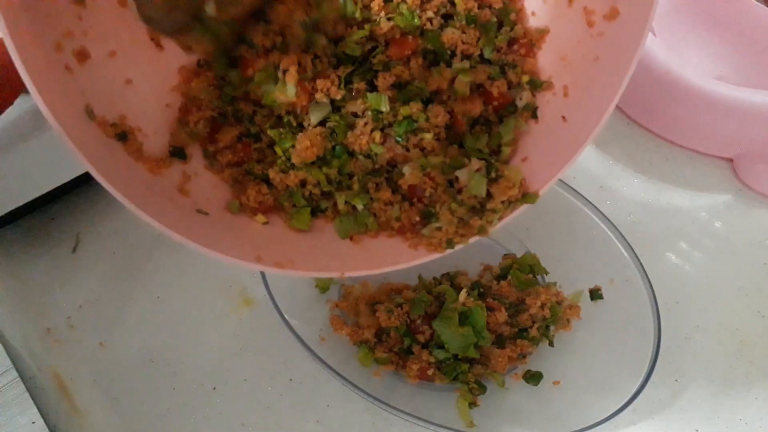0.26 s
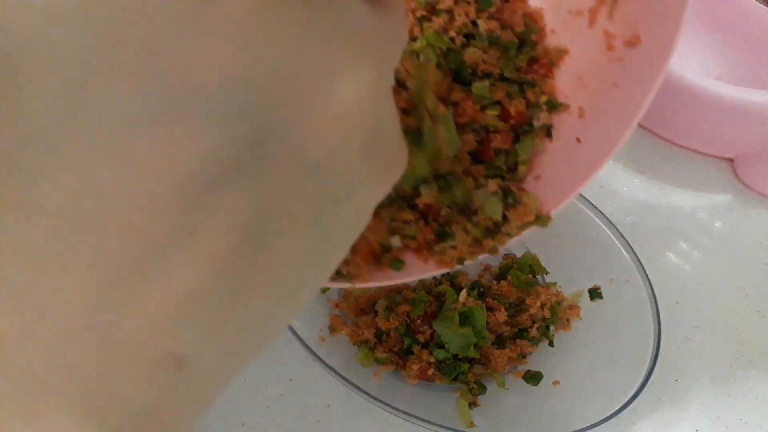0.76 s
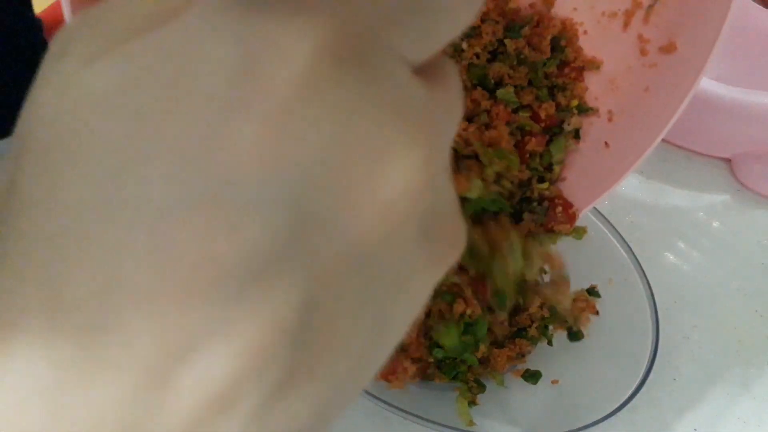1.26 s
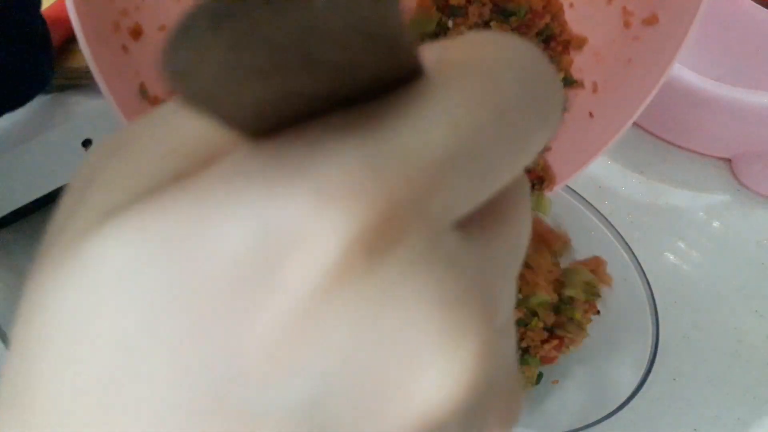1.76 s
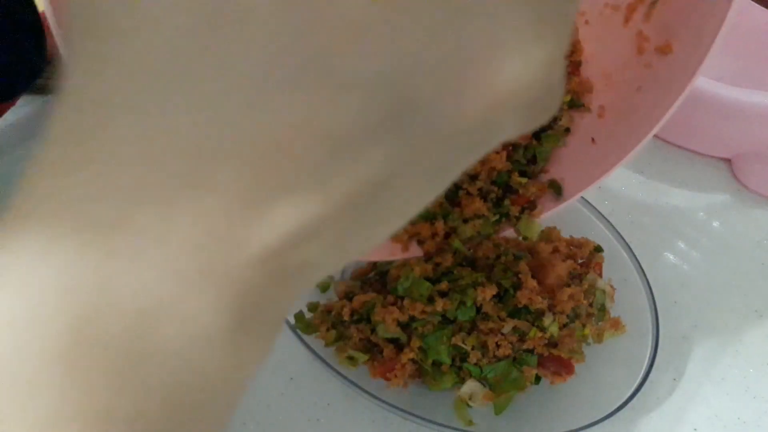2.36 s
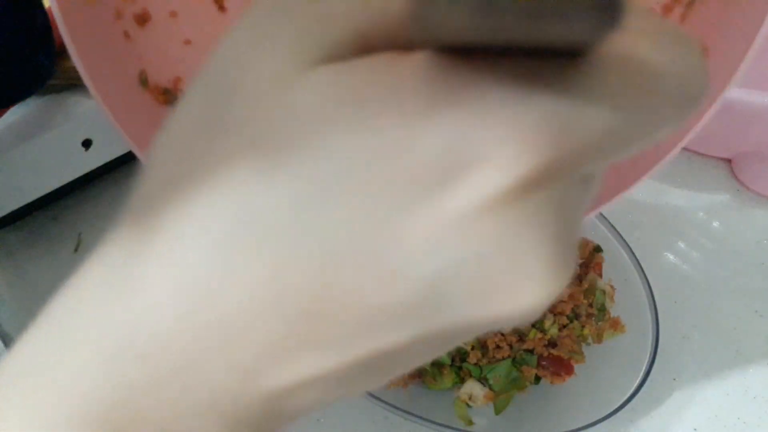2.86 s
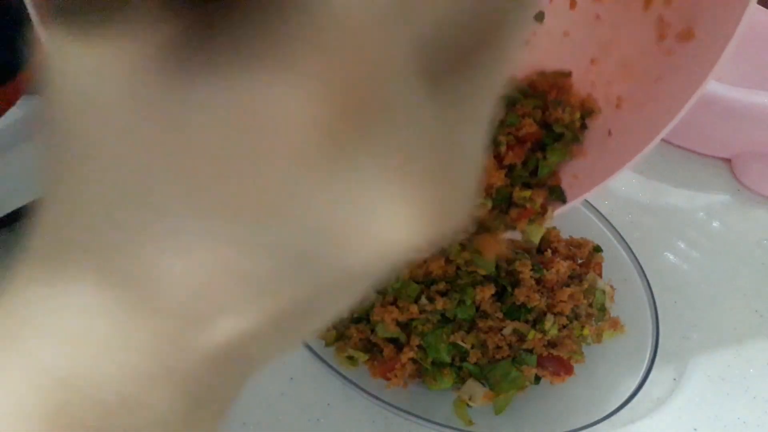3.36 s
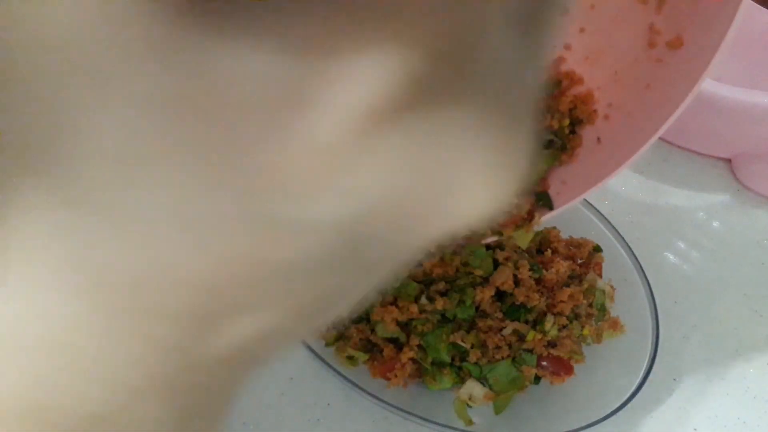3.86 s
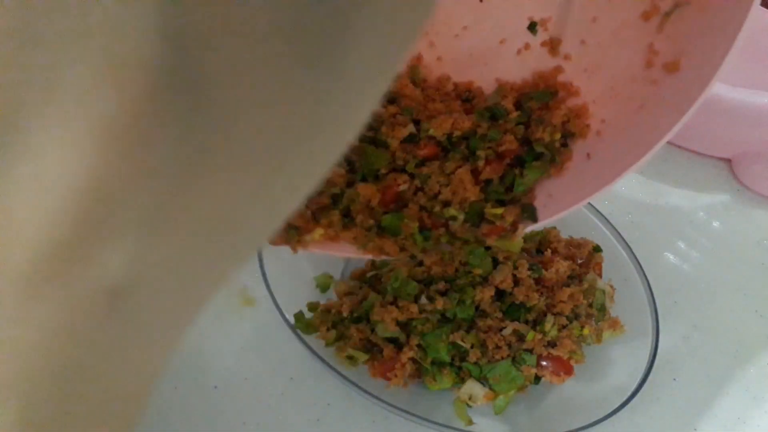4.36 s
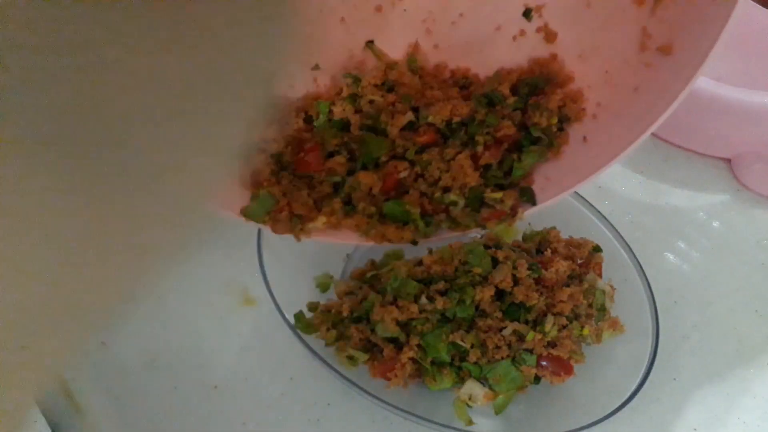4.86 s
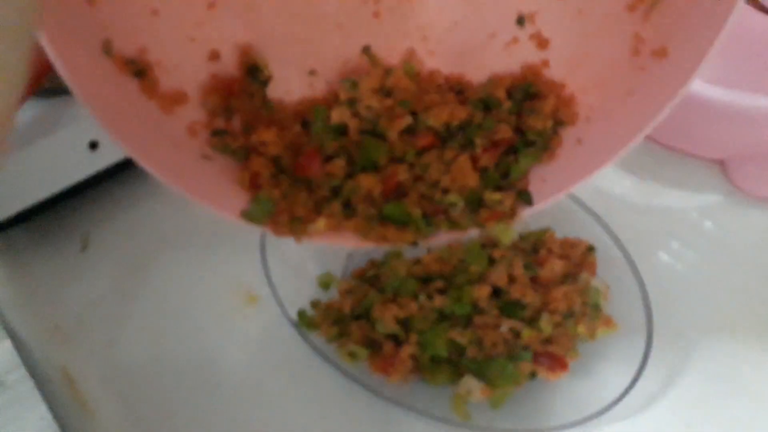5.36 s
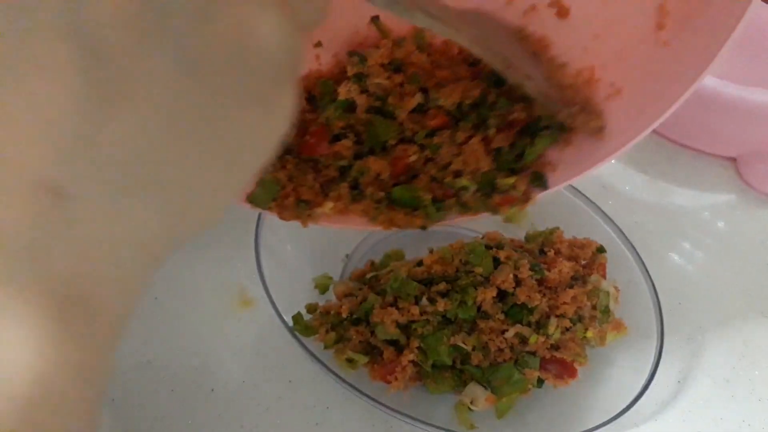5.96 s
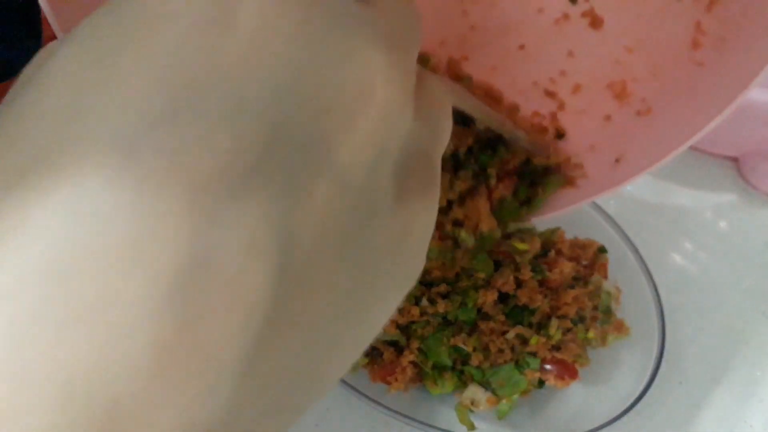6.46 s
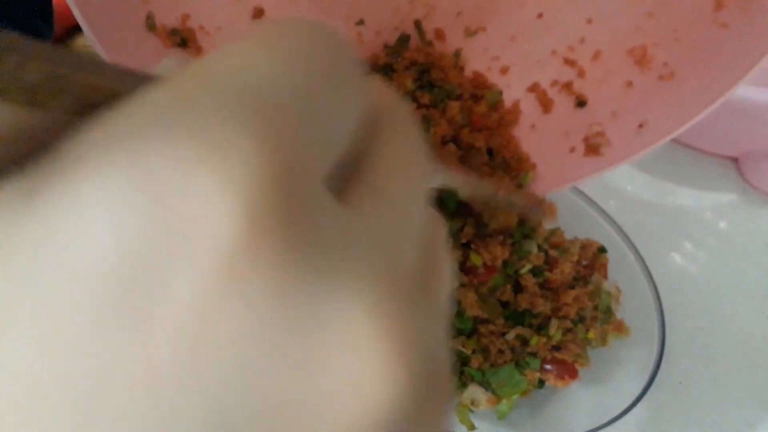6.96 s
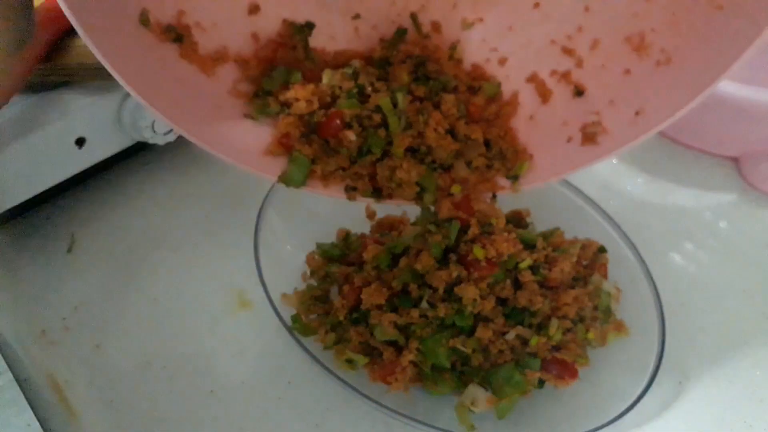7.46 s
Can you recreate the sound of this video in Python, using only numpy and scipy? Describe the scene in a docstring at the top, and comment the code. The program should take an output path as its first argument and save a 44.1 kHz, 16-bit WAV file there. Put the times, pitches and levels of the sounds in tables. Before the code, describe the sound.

A wooden spoon knocks a plastic bowl and pushes moist, crackling grain salad into a dish in short strokes, in a quiet kitchen.

```python
"""Grain salad pushed from bowl to dish

A wooden spoon pushes a moist grain salad out of a hand-held plastic bowl into a glass dish, heard close by.
Knocks on the bowl are struck modes behind a contact low-pass: sharp when bare, dull through food. Each stroke
builds and lets go: random grains crackle and fizz, and slips of the edge ring the bowl. Wet morsels are click
bursts ringing an air pocket; late on, the bowl shudders in low filtered noise. The small quiet kitchen is
coloured noise with a wavering hiss and hum, and a faint drone near 490 Hz wavers beneath it all."""
import sys
import numpy as np
from scipy import signal
from scipy.fft import rfft, irfft
from scipy.io import wavfile

SR = 44100
rng = np.random.default_rng(int(sys.argv[2]) if len(sys.argv) > 2 else 0)


def master_out(mix):
    """Clip the mix to full scale and print it as 16-bit PCM to the path in sys.argv[1]."""
    frames = np.transpose(np.atleast_2d(mix))
    ceiling = np.clip(frames, -1, 1)
    pcm = np.round(ceiling * 32767).astype(np.int16)
    wavfile.write(sys.argv[1], SR, pcm)


N = 339129
T = np.arange(N) / SR
RING = T[:SR // 2]  # time axis of one short sound

# strokes of the spoon, levels before the layer gains:
# (start [s], let go [s], salad level [dB], wall scrape level [dB], fizz level [dB])
STROKES = [(0.198, 0.487, -62, -58, -75), (0.727, 0.86, -67, -86, -84), (1.273, 1.35, -81, -61.5, -90),
           (2.412, 2.578, -58, -62.5, -73), (2.694, 2.827, -69.5, -70, -88), (3.265, 3.517, -61, -52, -73),
           (3.849, 4.055, -58, -46.5, -69.5), (4.438, 4.63, -66, -57, -74), (4.968, 5.034, -72.5, -79, -79),
           (5.31, 5.672, -68.5, -67.5, -78), (5.696, 6.002, -66, -68, -69), (6.06, 6.284, -72, -69, -85),
           (7.103, 7.18, -72, -66, -92), (7.485, 7.60, -69, -74, -79)]


def undb(db):
    """Decibels to amplitude gain."""
    return 10 ** (np.asarray(db) / 20)


def unit(x):
    """Scale to rms 1."""
    return x / np.sqrt(np.mean(x ** 2))


def attack_unit(x, size):
    """Scale so that the first size samples have rms 1."""
    return x / np.sqrt(np.mean(x[:size] ** 2))


def add(track, start_s, x):
    """Mix a sound into a track at a time."""
    i = int(start_s * SR)
    track[i:i + len(x)] += x[:N - i]


def cut(x, hz, kind, order=2):
    """Butterworth filter."""
    sos = signal.butter(order, np.minimum(hz, SR / 2 - 1), kind, fs=SR, output="sos")
    return signal.sosfilt(sos, x)


def resonate(x, hz, width_hz):
    """One resonance, gain 1 at its centre."""
    return signal.lfilter(*signal.iirpeak(hz, hz / width_hz, fs=SR), x)


def colour(x, points, size=4096):
    """Minimum-phase filter with a (frequency [Hz], gain [dB]) spectrum, built from the cepstrum."""
    hz, db = np.transpose(points)
    grid_hz = np.maximum(np.fft.rfftfreq(size, 1 / SR), 1)
    gain = undb(np.interp(np.log(grid_hz), np.log(hz), db))
    cepstrum = irfft(np.log(gain))
    # fold onto positive time to make the response causal
    cepstrum[1:size // 2] *= 2
    cepstrum[size // 2 + 1:] = 0
    response = irfft(np.exp(rfft(cepstrum)))
    return signal.fftconvolve(x, response)[:len(x)]


def fade(t60_s):
    """Exponential decay, 60 dB down after t60_s."""
    return np.exp(-np.log(1000) * RING / t60_s)


def mode(hz, t60_s):
    """A struck resonance: a decaying cosine whose spectral peak is near 1."""
    peak_scale = 2 * np.log(1000) / (t60_s * SR)
    return np.cos(2 * np.pi * hz * RING) * fade(t60_s) * peak_scale


def grains(rate_hz, spread_db, size=N):
    """Random tiny clicks, most faint and a few strong; rms 1."""
    strength = undb(spread_db * np.minimum(rng.exponential(size=size), np.pi))
    hits = rng.random(size) < rate_hz / SR
    return unit(hits * rng.standard_normal(size) * strength)


def clumps(rate_hz, depth_db):
    """A gain that wanders between random dB values drawn rate_hz times a second."""
    knots = rng.standard_normal(1024)
    return undb(depth_db * np.interp(T * rate_hz, np.arange(len(knots)), knots))


def push(start_s, end_s, build_db, attack_s=0.0067, release_db_per_s=176):
    """Gain of one push: sets in quickly, grows by build_db to 1, dies away once the hand lets go."""
    onset = np.clip((T - start_s) / attack_s, 0, 1)
    to_go = np.clip((end_s - T) / (end_s - start_s), 0, 1)
    release_db = release_db_per_s * np.maximum(T - end_s, 0)
    return onset * undb(-build_db * to_go - release_db)


def bowl_ring():
    """The bowl's modes, drawn a little different in strength and pitch as the place of contact varies."""
    # (frequency [Hz], gain [dB], t60 [s])
    bowl_modes = [(220.7, 1.5, 0.29), (266, -3, 0.48), (315.3, 3, 0.23), (374, -4, 0.045),
                  (487, -10.5, 0.14), (638, 8, 0.26), (735, -26, 0.11), (897, -21, 0.25),
                  (1033, -6.5, 0.041), (1100, 3, 0.1), (1190, -6, 0.15), (1620, 0, 0.04),
                  (1850, -27.5, 0.081), (2340, 2, 0.056), (2540, -6, .08), (2770, -16, 0.042)]
    chance = rng.standard_normal((len(bowl_modes), 2)) * [1.5, .003]  # dB, share of frequency
    ring = 0
    for (hz, db, t60_s), (louder_db, sharper) in zip(bowl_modes, chance):
        ring = ring + undb(db + louder_db) * mode(hz * (1 + sharper), t60_s)
    return ring


def room_echo(t60_low_s=0.33, t60_high_s=0.25, near_t60_s=0.057, near_db=7, delay_s=0.0015):
    """Quick reflections from counter and bowl, then the kitchen's short tail; energy 1."""
    far, near = rng.standard_normal((2, len(RING)))
    low = cut(far, 1200, "low", order=1)
    tail = low * fade(t60_low_s) + (far - low) * fade(t60_high_s)
    echo = tail + undb(near_db) * near * fade(near_t60_s)
    echo = echo * (RING > delay_s)
    return echo / np.sqrt(np.sum(echo ** 2))


def kitchen(room_db=-64, waver_db=3.0):
    """Room tone with a thin hiss, a low hum and a faint drone: noise bands, each wavering a little."""
    # room tone spectrum: (frequency [Hz], gain [dB])
    room_spectrum = [(15, -81.5), (25, -12), (64, -22), (113, 4.5), (148, -5), (227, -5), (368, -10),
                     (482, -10), (537, -14.5), (762, -14), (2120, -19), (2490, -25.5), (3000, -19),
                     (9050, -39.5), (15500, -30)]
    # hiss, hum and drone: (frequency [Hz], width of each of two passes [Hz], gain [dB])
    drone_bands = [(2466, 210, 0.6), (56.4, 31, 2.5), (488.4, 38, -1.5)]
    # hiss before band gain: (time [s], level [dB])
    hiss_level = [(0, -86), (0.65, -70.5), (1.1, -68), (1.27, -80), (1.6, -72.0), (1.81, -62), (2.0, -73.5),
                  (2.25, -70), (3.0, -77), (3.75, -73), (4.2, -71), (4.82, -72.5), (5.1, -64.5),
                  (5.5, -70.5), (6.4, -78), (6.75, -74), (7.69, -70.0)]
    # hum and drone before band gain: (time [s], hum level [dB], drone level [dB])
    hum_level = [(0.0, -80, -84), (0.3, -78, -92), (1.05, -78, -76), (3.92, -74, -78.5), (4.07, -73, -65),
                 (4.75, -69.5, -81.5), (7.19, -80, -71.5), (7.69, -66, -80)]
    out = undb(room_db) * unit(colour(rng.standard_normal(N), room_spectrum))
    time_s, hum_db, drone_db = np.transpose(hum_level)
    hiss = np.interp(T, *np.transpose(hiss_level))
    levels_db = hiss, np.interp(T, time_s, hum_db), np.interp(T, time_s, drone_db)
    for (hz, width_hz, gain_db), level_db in zip(drone_bands, levels_db):
        band = resonate(resonate(rng.standard_normal(N), hz, width_hz), hz, width_hz)
        out = out + undb(gain_db + level_db) * unit(band) * clumps(rate_hz=7.7, depth_db=waver_db)
    return out


def salad(gain_db=-1, pop_db=-5, pocket_width_hz=400, fizz_db=-1, build_db=10.5,
          settling_db=-77, squirt_t60_s=0.044):
    """Under each stroke moist grains slide in a fine, lumpy crackle; small pockets pop and the juice fizzes."""
    # crackle spectrum: (frequency [Hz], gain [dB])
    crackle_spectrum = [(40, -47), (300, 0), (1000, 1.5), (2000, 3.5), (3300, 4), (5500, 4.5), (7000, -2.5),
                        (8200, -14.5), (9500, -20.5), (11000, -10), (15500, -31.5)]
    # air pockets between the wet pieces: (frequency [Hz], gain [dB])
    pockets = [(1300, 0.5), (1750, -3), (2300, 1), (3100, -4), (4200, -3), (5600, -9)]
    # juice squirting out with a thin spit, before fizz_db: (time [s], level [dB])
    squirts = [(3.044, -57), (4.262, -58.5)]
    pressure = undb(settling_db)  # goes on ticking between strokes
    juice = np.zeros(N)
    for start_s, end_s, salad_db, _, juice_db in STROKES:
        stroke = push(start_s, end_s, build_db)
        pressure = pressure + undb(salad_db) * stroke
        juice += undb(juice_db) * stroke
    for time_s, db in squirts:
        add(juice, time_s, undb(db) * fade(squirt_t60_s))

    lumps = clumps(rate_hz=70, depth_db=2.8)
    crackle = unit(colour(grains(rate_hz=2000, spread_db=2.2) * lumps, crackle_spectrum))
    pops = np.zeros(N)
    for hz, db in pockets:
        pops += undb(db) * resonate(grains(rate_hz=45, spread_db=2), hz, pocket_width_hz)
    pops = unit(cut(pops, 5800, "low", order=4))
    rustle = undb(gain_db) * crackle + undb(pop_db) * pops
    fizz = unit(cut(grains(rate_hz=9000, spread_db=1) * lumps, 10500, "high", order=6))
    return rustle * pressure + undb(fizz_db) * fizz * juice


def morsels(pocket_db=13, width_hz=330, gain_db=-9, snap_db=12, top_hz=7000, t60_s=0.065):
    """A wet piece snaps loose, then lets go in a quick run of clicks that ring a small air pocket."""
    # louder morsels that part and land: (time [s], attack level before gain_db [dB], pocket frequency [Hz])
    drops = [(0.1246, -46.5, 2330), (0.6806, -50.5, 1830), (0.8056, -48, 1900), (0.846, -41.5, 3300),
             (1.3104, -50, 2780), (1.3309, -46.5, 2640), (1.4222, -45.5, 2740), (1.481, -43, 2600),
             (1.8793, -46.5, 2820), (2.1026, -50.5, 2400), (2.339, -54.5, 4200), (2.8138, -50.5, 2120),
             (3.1115, -50.5, 3240), (3.1562, -53, 2180), (3.5446, -47, 3240), (4.4757, -47.5, 2530),
             (4.6092, -54, 1580), (4.6565, -47.5, 2570), (5.6575, -48, 1750), (5.7638, -50, 2640),
             (5.7967, -49, 2420), (5.8995, -46, 1660), (6.6446, -48.5, 1980), (6.7543, -49, 2440),
             (6.9405, -50, 2490), (7.1277, -46, 1570), (7.217, -49.5, 2370), (7.3488, -50, 2290)]
    out = np.zeros(N)
    for time_s, db, hz in drops:
        clicks = grains(rate_hz=8000, spread_db=1, size=len(RING)) * fade(t60_s)
        clicks[0] += undb(snap_db)
        body = cut(cut(clicks, 2300, "high"), 2400, "low")
        smack = body + undb(pocket_db) * resonate(clicks, hz, width_hz)
        smack = cut(smack, top_hz, "low", order=6)
        add(out, time_s, undb(db + gain_db) * attack_unit(smack, size=330))
    return out


def scrapes(ring_db=3, build_db=11):
    """The spoon's edge catches and slips on the wall, and each slip rings the bowl."""
    # scrape spectrum: (frequency [Hz], gain [dB])
    drag_spectrum = [(30, -55), (100, -38.5), (250, -0.5), (600, -0.5), (1100, -6.5), (1800, -9.5),
                     (3000, -12.5), (5000, -19.5), (9000, -33), (16000, -60)]
    pressure = sum(undb(db) * push(start_s, end_s, build_db) for start_s, end_s, _, db, _ in STROKES)
    slips = grains(rate_hz=450, spread_db=3.5) * clumps(rate_hz=80, depth_db=3)
    wall = slips + undb(ring_db) * signal.fftconvolve(slips, bowl_ring())[:N]
    return unit(colour(wall, drag_spectrum)) * pressure


def bowl_echo(x, gap_s=.0052, echo_db=-8):
    """The inside of the bowl throws the blow back once, a few milliseconds later and quieter."""
    return x + undb(echo_db) * np.interp(RING - gap_s, RING, x, left=0)


def disperse(x, bands=((800, 600), (1500, 700), (2600, 900), (4200, 1400))):
    """Bending waves cross the wall at different speeds: all-pass filters smear a blow by a millisecond or two."""
    for hz, width_hz in bands:
        x = x - 2 * resonate(x, hz, width_hz)
    return x


def knocks(ring_db=4, patch_db=6, low_cycles=13, high_cycles=24, wet_db=-1.5, leak_db=-6, bass_ratio=0.77):
    """Each blow flexes a patch of the wall and rings the bowl; food under the spoon softens the contact."""
    # spoon on bowl: (time [s], attack level [dB], contact cut-off [Hz], low patch mode [Hz], its gain [dB],
    # high patch mode [Hz], its gain [dB], bowl ring gain [dB]); gains before patch_db and ring_db
    blows = [(0.2089, -28, 1930, 225, -1.5, 625, -7.5, -1.5), (0.4526, -50, 2200, 500, -3, 877, -5, -10),
             (0.478, -48.5, 1690, 630, 2, 890, -14, -5), (1.337, -57, 900, 514, 10, 716, -2, -12),
             (2.3972, -23.5, 2200, 266, 19, 490, 15.5, -3), (2.499, -49, 2410, 644, 3, 1230, -17, -11),
             (2.516, -48, 2400, 660, 11, 1150, -16, -9), (2.549, -29.5, 505, 330, -5, 390, -9.5, -23),
             (2.8137, -58.5, 1100, 278, -3.5, 473, -3, -8), (3.2518, -35.5, 555, 190, -24, 580, -6, 1),
             (3.276, -42, 557, 186, 14, 330, -4, -17), (3.337, -52, 1470, 650, 12, 970, -8, 15),
             (3.451, -46, 654, 330, 1, 476, -11, -8), (3.851, -45.5, 550, 300, -13, 490, 4, -8),
             (3.8654, -22.5, 1880, 204, 12.5, 634, 0, 6), (3.8674, -33, 3300, 800, -9, 974, 10, 1),
             (3.959, -40.5, 550, 194, 18, 400, -6, -10), (3.993, -46.5, 2500, 644, -2, 1260, -1, 6),
             (4.057, -48, 2200, 635, 1.5, 1210, -5, -9), (4.3443, -40, 526, 175, 3, 360, -12, -23),
             (4.658, -58, 4500, 540, -19, 1610, -7, 0), (4.983, -49.5, 2200, 800, -6, 1480, -13, -4),
             (5.3037, -34.5, 2450, 707, -1.5, 1514, -6, -8), (5.3363, -41.5, 550, 167, 5, 336, -0.5, -10),
             (5.487, -57, 586, 383, -8, 516, -9, -10), (5.658, -52, 3500, 168, 18, 1680, 19, -20),
             (5.8975, -57.5, 3500, 390, 9, 1580, -13, -4), (7.4842, -21, 3180, 208, -1.5, 636, -6, 3),
             (7.576, -39.5, 2000, 262, 2, 444, -11, -18)]
    # overtones of the high patch mode: (frequency ratio, gain [dB])
    overtones = [(1, 10), (1.56, -13), (1.9, -5), (3.42, -3)]
    # sound radiated by a bare blow: (frequency [Hz], gain [dB])
    blow_spectrum = [(40, -15.5), (100, 4.5), (200, 5.5), (400, -0.5), (700, -5), (1200, -8.5), (1550, -12),
                     (1850, -16), (2300, -14), (3200, -17.5), (5000, -15.5), (7000, -16), (16000, -74)]
    out = np.zeros(N)
    contact = bowl_echo(signal.unit_impulse(len(RING)))
    for time_s, db, contact_hz, low_hz, low_db, high_hz, high_db, bowl_db in blows:
        # soft plastic dies away within a fixed number of cycles
        lower = mode(low_hz, low_cycles / low_hz)
        upper = 0
        for ratio, part_db in overtones:
            t60_s = high_cycles / high_hz / np.sqrt(ratio)
            upper = upper + undb(part_db) * mode(high_hz * ratio, t60_s)
        patch = undb(patch_db) * (undb(low_db) * lower + undb(high_db) * upper)
        # the flexing patch is heard mostly close up and sends less into the room
        echo = signal.fftconvolve(contact + undb(leak_db) * patch, room_echo())[:len(RING)]
        ring = undb(ring_db + bowl_db) * bowl_ring()
        blow = disperse(contact + patch + undb(wet_db) * echo + ring)
        blow = cut(colour(blow, blow_spectrum), contact_hz, "low", order=4)
        # a patch radiates little far below its low mode
        blow = cut(blow, bass_ratio * low_hz, "high", order=2)
        # the wall first moves away, so the pressure starts with a dip
        add(out, time_s, -undb(db) * attack_unit(blow, size=880))
    return out


def shudder(start_s=7.365, end_s=7.48, level_db=-46.5, hz=125, width_hz=55):
    """Slow rubbing as the spoon is drawn out shakes the whole bowl at a low pitch, evenly until it comes free."""
    shake = resonate(rng.standard_normal(N), hz, width_hz)
    shake = unit(cut(cut(shake, 330, "low"), 85, "high"))
    return undb(level_db) * shake * push(start_s, end_s, build_db=0)


def scene(wet_db=-6):
    """Everything happens straight ahead, so both channels hear the same."""
    small = morsels() + salad() + scrapes()
    small = small + undb(wet_db) * signal.fftconvolve(small, room_echo())[:N]
    return np.tile(knocks() + small + shudder() + kitchen(), (2, 1))


def record(dry, noise_db=-75.0, top_hz=15750):
    """Each channel adds its own faint hiss; an elliptic low-pass cuts the top."""
    # channel hiss spectrum: (frequency [Hz], gain [dB])
    mic_spectrum = [(24, -39), (40, -19), (166, -11), (670, -10), (2220, -13.5), (2390, -15.5), (3930, -17),
                    (15500, -24.5)]
    hiss = np.array([unit(colour(rng.standard_normal(N), mic_spectrum)) for _ in dry])
    noisy = dry + undb(noise_db) * hiss
    top_cut = signal.ellip(10, .2, 70, top_hz, fs=SR, output="sos")  # ripple 0.2 dB, stop band -70 dB
    return signal.sosfilt(top_cut, noisy)


dry = scene()
out = record(dry)
master_out(out)
```